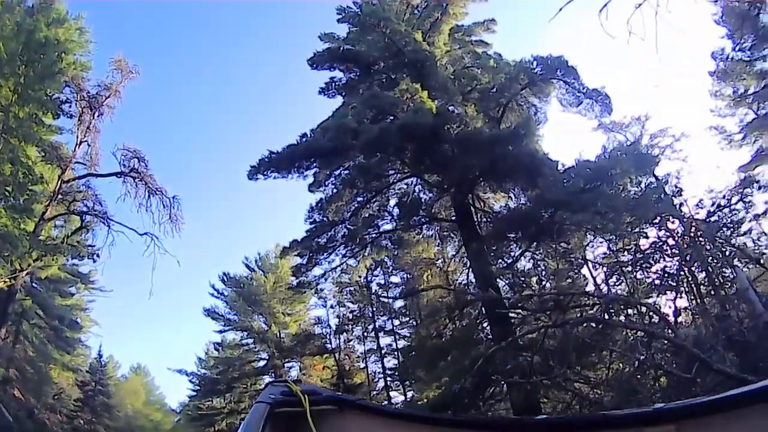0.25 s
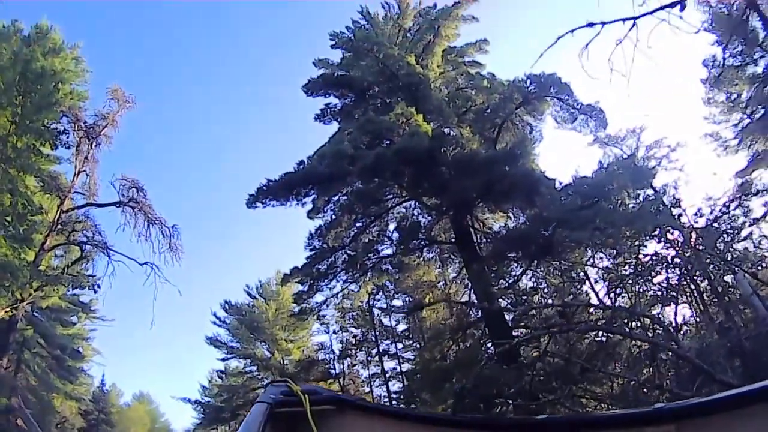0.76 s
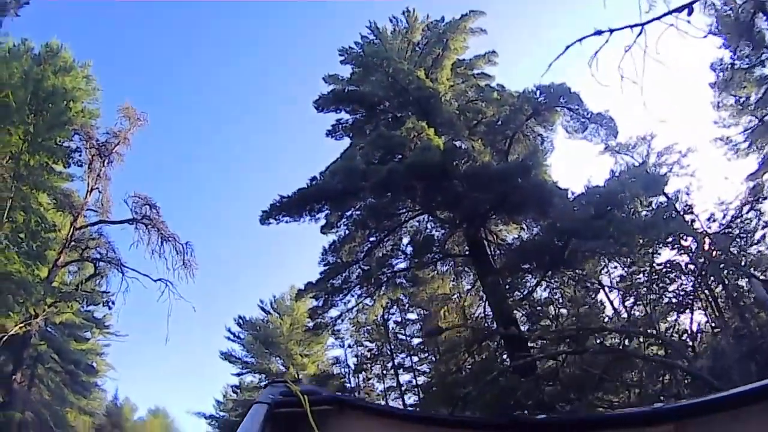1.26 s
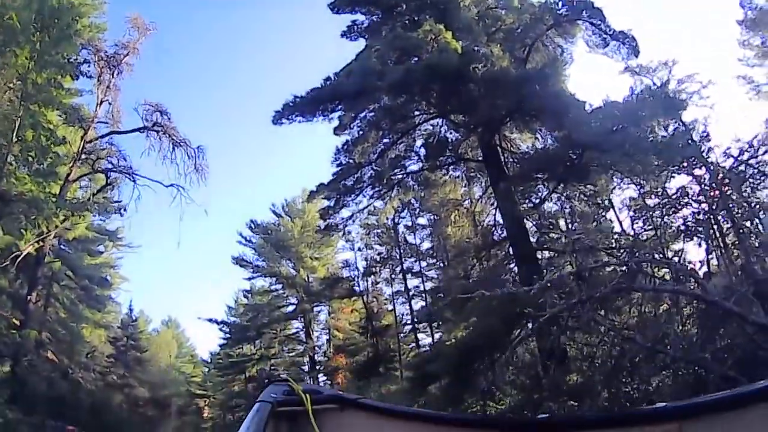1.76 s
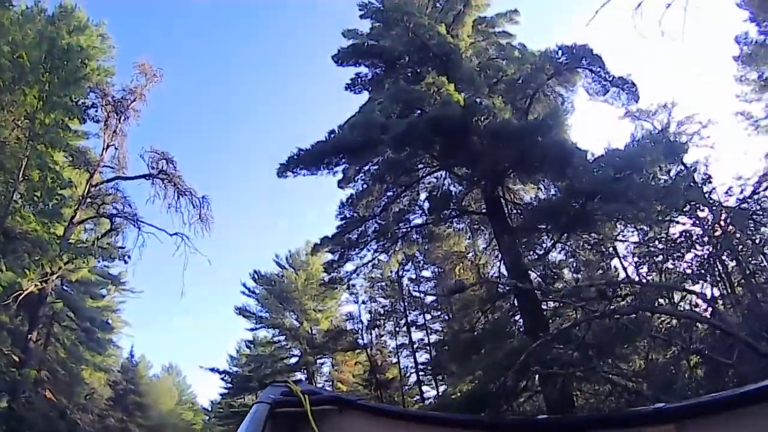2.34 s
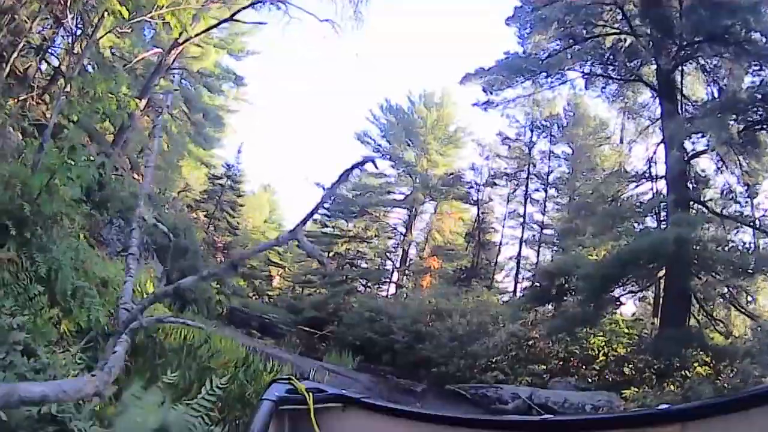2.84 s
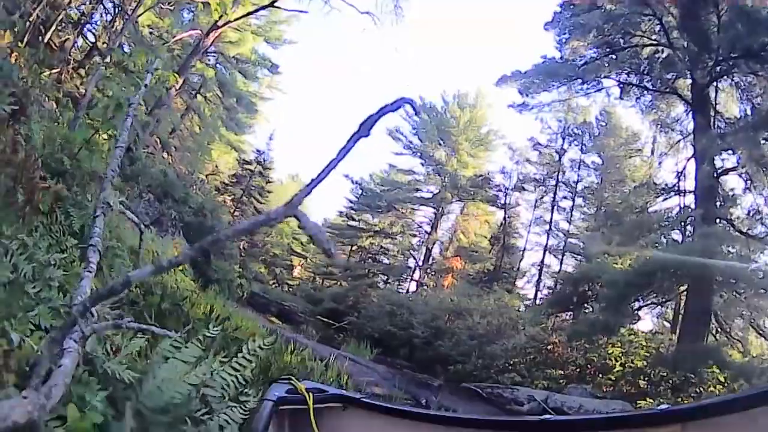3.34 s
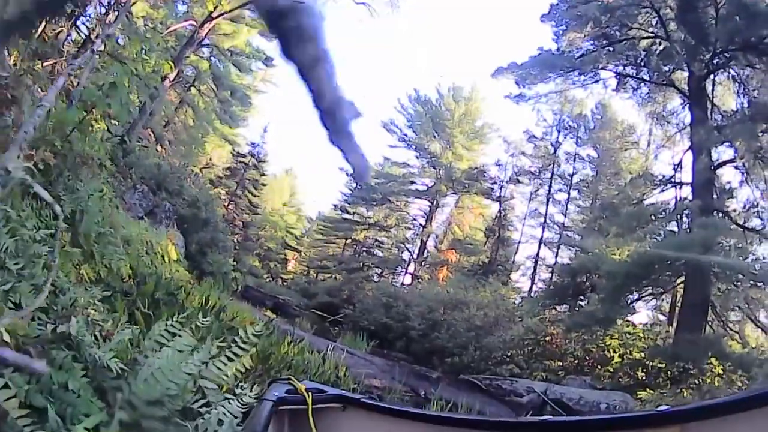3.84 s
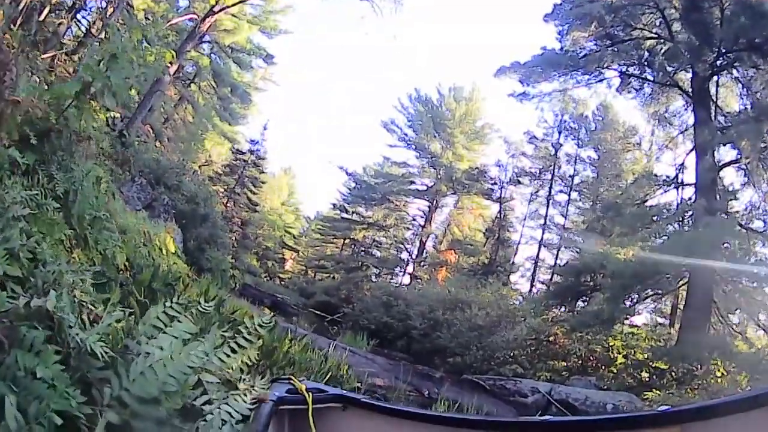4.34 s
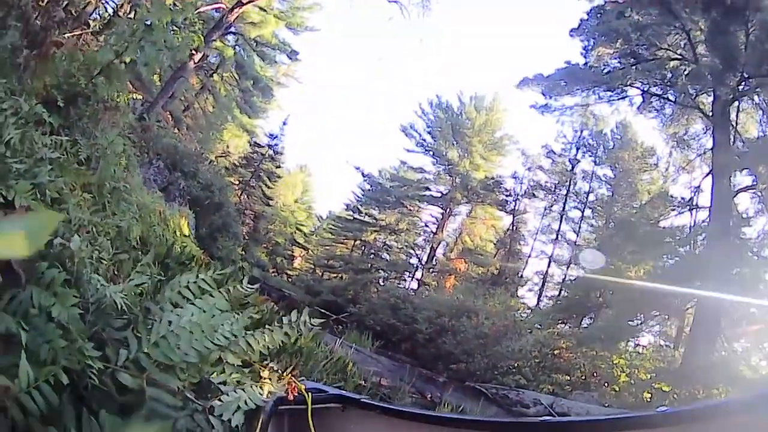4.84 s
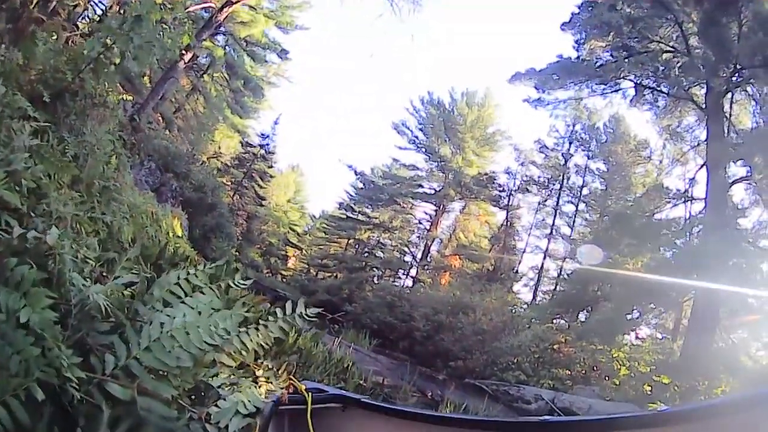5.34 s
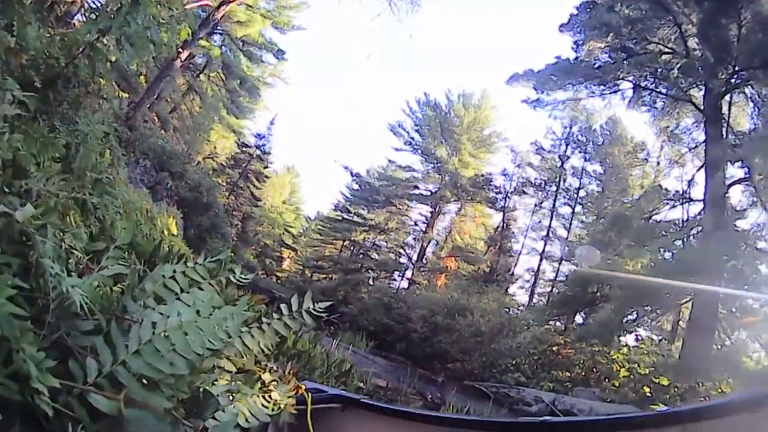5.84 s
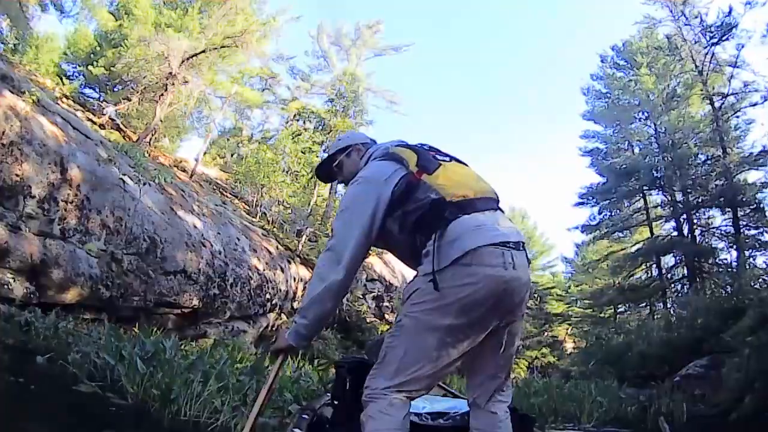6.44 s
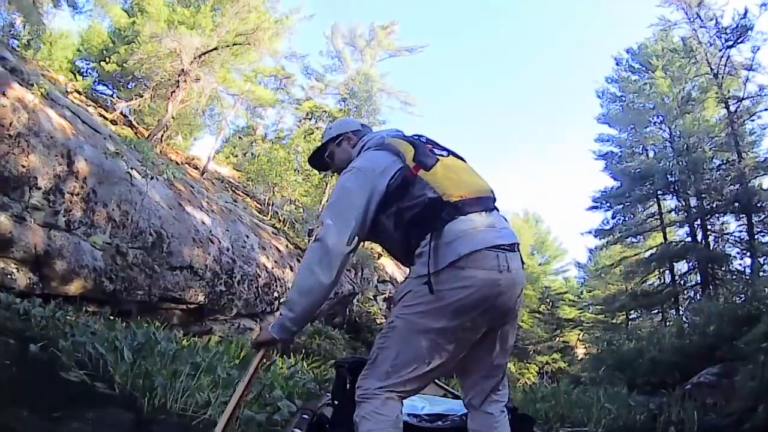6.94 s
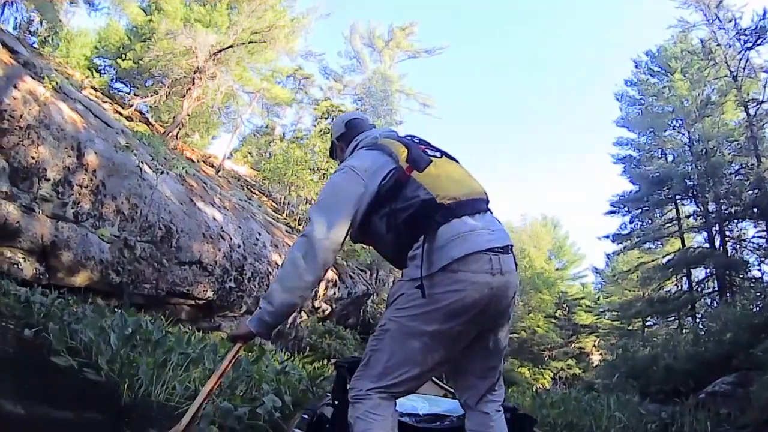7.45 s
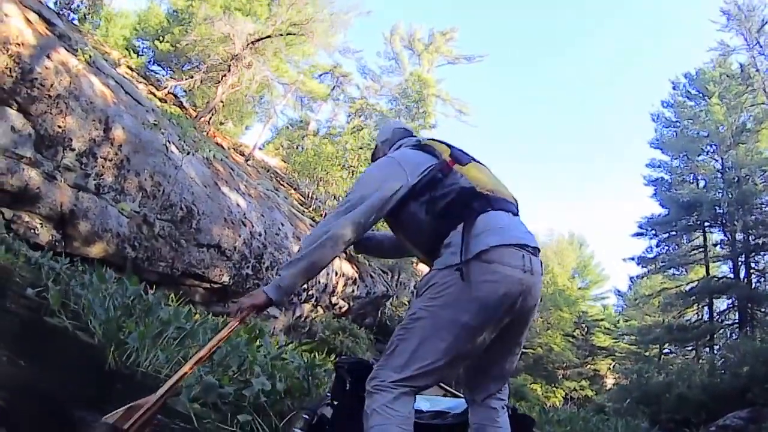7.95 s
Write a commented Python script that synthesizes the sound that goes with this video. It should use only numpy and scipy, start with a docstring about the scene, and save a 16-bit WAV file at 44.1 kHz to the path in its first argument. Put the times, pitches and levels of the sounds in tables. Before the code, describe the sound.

Gear clacks and thumps in a boat while its hull shudders over the shallow bottom. The scraping strengthens around two very hard, distorted bumps, with low wavering groans between. Dry twigs tick and a branch squeaks in high gliding chirps. The scraping stops near the end, leaving gentle water along the hull, faint hiss and a thin whine. The microphone rides on the boat, resonant and dull in the treble.

```python
"""Canoe shoved along a shallow creek

Gear knocks in the boat: clicks ring the hull's flex, its panels and a plastic case; twigs tick as dry noise bursts.
The hull grinds over the bottom (random slips ring those modes, near-regular ones groan), then slides on
through shaped-noise water. A branch squeaks along the side: a gliding stick-slip tone that breaks into chirps.
The microphone rides on the boat in the closed case, which rings near 1.4 kHz and muffles the treble;
hard blows clip the input, over hiss and a faint late whine."""
import sys
import numpy as np
from scipy import signal
from scipy.fft import rfft, irfft
from scipy.io import wavfile
from scipy.ndimage import uniform_filter1d

SR = 44100
rng = np.random.default_rng(int(sys.argv[2]) if len(sys.argv) > 2 else 0)


def digitize_waveform(pressure):
    """Quantize a signal to 16-bit integers and store it at the path in sys.argv[1].

    Rows of a 2-D input are taken as channels; values are limited to [-1, 1].
    """
    field = np.atleast_2d(pressure).T
    bounded = np.clip(field, -1, 1)
    quanta = np.round(bounded * 32767).astype(np.int16)
    wavfile.write(sys.argv[1], SR, quanta)


N = 361179
TIME = np.arange(N) / SR

# Levels in the tables are drive levels, ahead of each layer's own trims.
# resonances of the whole hull flexing: (f/Hz, relative level/dB, t60/s before scaling)
FLEX_MODES = [(44.8, -16.5, 0.39), (73.4, 0.5, 0.15), (81.76, 2.5, 0.44), (98.3, -9.5, 0.31),
              (104.6, -1.5, 0.1), (144.8, -8, 0.47), (173, 1.5, 0.092)]
# resonances of the hull panels: (f/Hz, relative level/dB, t60/s before scaling)
PANEL_MODES = [(187.45, -11, 0.42), (199.2, -10.5, 0.31), (258.8, -27, 0.83), (301.1, -2, 0.19),
               (330.2, 1.5, 0.17), (355.9, -1, 0.12), (395.9, -4, 0.11), (454.9, 2, 0.088),
               (509.2, -2, 0.09), (591.7, -2.5, 0.048), (660.2, -3.5, 0.1), (833.6, -8, 0.07)]
# resonances of the plastic case: (f/Hz, relative level/dB, t60/s before scaling)
CASE_MODES = [(1022, -20, 0.11), (1185.3, -6, 0.052), (1327, 4, 0.013), (1454, -1, 0.047),
              (1565, -3.5, 0.032), (1714, -0.5, 0.041), (1948, -4, 0.02), (2066, -8.5, 0.032),
              (3160, -9.5, 0.0045), (3740, -28, 0.043), (4220, -45, 0.0045)]

# the hull slides over the bottom, levels as at its end:
# (start t/s, end t/s, flex level/dB, panel level/dB, rasp level/dB, growth from start to end/dB)
SLIDES = [(-.05, 0.607, -49.5, -35.5, -42, -5), (0.704, 0.994, -48, -38, -77, -8),
          (1.207, 1.7, -52, -39, -53.5, 0.5), (1.88, 2.252, -52, -40.5, -55, -5),
          (2.32, 2.498, -69, -46.5, -51.5, -10), (2.509, 2.988, -35, -24, -33, 12),
          (2.993, 3.155, -36, -19, -22, -14), (3.21, 3.89, -46, -33.5, -34.5, 0.5),
          (3.858, 4.488, -45.5, -23.5, -34.5, 1.5), (4.695, 4.928, -24.5, -19.5, -30.5, 8),
          (4.91, 5.453, -57, -15.5, -29, 4.5), (5.445, 5.973, -44, -23, -36.5, 2),
          (5.978, 6.302, -28, -25.5, -38.5, -1)]
# the hull shifting between slides: (flex level/dB, panel level/dB, rasp level/dB)
RESTING_DB = (-50.5, -45.5, -72.5)
# brief hard scuffs: (middle t/s, half-length/s, panel level/dB, rasp level/dB)
SCUFFS = [(2.801, 0.014, -45, -23), (2.832, 0.02, -20, -75), (3.843, 0.013, -40.5, -21),
          (4.275, 0.024, -32, -34)]
GRIP_S, COAST_S = 0.079, 0.048   # a slide takes hold; time constant of its dying away
GRIT_PER_S, GRIT_DB = 20, 1.5   # grains cracking under the hull; drive against the rasp
FLOAT_S = 6.42   # the hull comes free of the bottom

# colour of the water wash: (f/Hz, relative density level/dB per Hz)
WASH_COLOUR = [(35, -52), (60, -15), (92, 0), (112, -34.5), (129, -14), (188, 1.5), (206, 1), (226, -31.5),
               (280, -54), (321, 1), (374, -3), (638, -9.5), (880, -33.5), (1430, -8.5), (2300, -20.5),
               (2990, -36), (5060, -120)]
SHALLOWS_DB = -50   # drive of the lapping while the hull is aground
WASH_DB, WASH_GAIN_DB_PER_S = -43, 5   # drive as the hull floats free, growing as the boat gathers way

# blows on the boat: (t/s, hull flex level/dB, panel ring level/dB, sharp clack level/dB)
KNOCKS = [(0.18, -25, -8, 0), (.218, -48, -12.5, -33), (.696, -62, -20.5, -18.5), (0.787, -35, -18.5, -32),
          (0.867, -57, -22, -10.5), (.921, -60, -40, -27.5), (1.14, -54, -24, -26),
          (1.359, -69, -45, -30.5), (1.536, -29, 0.5, -0.5), (1.816, -42, -20, -12), (1.889, -38, -13, 3.5),
          (1.9, -33, -9.5, -7), (2.033, -41, -21, -50), (2.134, -39, -7.5, 3.5), (2.205, -30, -20.5, -14),
          (2.516, -21, -30, -50), (2.551, -47, -25, -21.5), (2.774, -27.5, -11, -10),
          (2.978, -45, -18, -9.5), (3.014, -26, 21, 18), (3.152, -6.5, -1.5, 6.5), (3.237, -30, -18, -35),
          (3.34, -21.5, -23.5, -19), (3.501, -52, -21, -10), (3.812, -36, -17, -22), (3.846, -46, -17, -8),
          (4.155, -42, -29, -11), (4.574, -55, -38, -14.5), (4.621, -58, -28, -19.5),
          (4.641, -1, 15.5, 7.5), (4.72, -12, -15, -5.5), (4.924, -15, -8.5, -31), (5.153, -50, -9, -5.5),
          (5.181, -27, -8.5, -3), (5.279, -49, -5, -16), (5.328, -45, -5.5, 8), (5.338, -33, -18, 7),
          (5.373, -29, -24, 5), (5.409, -30, -20, -5), (5.819, -21.5, -15, -17), (6.018, -10.5, -19, -46),
          (6.057, -37, -18.5, -10.5), (6.197, -21, -18, -33), (6.243, -14.5, -21, -23),
          (6.789, -25, -32, -60)]
# juddering after the two hardest bumps:
# (first rebound t/s, flex level/dB, panel level/dB, clack level/dB)
JUDDERS = [(3.040, 1, 1.5, 11), (4.66, -4.5, -2.5, 2.5)]
REBOUND_S = .0218   # spacing of the rebounds
# lost per rebound: (flex level/dB, panel level/dB, clack level/dB)
REBOUND_LOSS_DB = (1, 2.5, 4.5)

# twigs tick on the case: (t/s, peak level/dB)
TICKS = [(0.2746, -40), (0.3205, -40), (2.0964, -47), (2.675, -37), (3.8125, -44), (6.057, -24.5),
         (6.107, -35), (6.2326, -35), (6.244, -41)]
# a faint high jingle follows some bumps: (t/s, level/dB)
JINGLES = [(.24, -67), (4.73, -59.5), (6.03, -63), (6.17, -86)]
JINGLE_DECAY_S = 0.31   # time constant

# a short rubbing squeak: (t/s, f/Hz, level/dB)
SQUEAK = [(1.2, 3253, -64), (1.222, 3557, -47.5), (1.238, 3000, -58), (1.254, 1986, -33.5),
          (1.268, 2020, -26.5), (1.284, 2620, -53), (1.296, 2500, -54), (1.312, 3270, -44),
          (1.335, 3352, -63)]
# the branch squeals along the side: (t/s, f/Hz, level/dB)
SQUEAL = [(3.42, 2569, -45), (3.434, 2340, -30), (3.458, 2720, -38.5), (3.526, 2762, -33),
          (3.55, 2274, -22.5), (3.576, 2240, -34), (3.726, 2356, -31.5), (3.746, 2510, -41),
          (3.792, 2426, -34.5), (3.815, 2480, -37)]
PRESS_S, PRESS_HALF_S = 3.635, 0.067   # where the branch presses hardest, and for how long either side
OCTAVE_DROP_DB = -21.5   # the half-pitch tone at full pressure
LOCK_HZ, LOCK_GRIP = 1184, 1.8   # resonance that the half-pitch tone locks to, and how readily

# the branch skitters in runs of short chirps: (start t/s, end t/s, f/Hz, level/dB)
SKITTERS = [(2.872, 2.91, 2690, -45), (3.168, 3.275, 2990, -36), (3.272, 3.346, 2274, -30.5),
            (3.283, 3.427, 3060, -45), (3.866, 3.953, 2510, -38.5), (5.171, 5.303, 2950, -40.5)]
CHIRP_S = .034   # usual length
# shares of the pitch: scatter between chirps, fall within a chirp, random variation of that glide
CHIRP_SPREAD, CHIRP_SAG, CHIRP_BEND = 0.023, 0.093, 0.066

# groans of the sticking and slipping hull: (start t/s, length/s, starting f/Hz, peak level/dB)
GROANS = [(3.029, 0.28, 176, -14.5), (3.87, 0.51, 180.6, -28), (3.95, 0.13, 319, -24.5),
          (4.25, 0.29, 305, -27), (4.68, 0.12, 161.6, -10.5), (5.02, 0.53, 313.6, -15.5)]
GROAN_RISE_PER_S, GROAN_PEAK_AT = .14, 0.34   # share of pitch gained per second; share of length at the peak
GROAN_FLUTTER_DB = 2.3

CASE_CUT_HZ, CASE_LEAK_DB = 2236, -6.5   # the closed case muffles the treble above the cut
OVERLOAD = .32   # amplitude at which the input clips
HISS_DB, HISS_LATE_DB, HISS_STEP_S = -65, -59, 6.33   # electronic hiss steps up near the end
WHINE_HZ, WHINE_DB = 10850, -79
CUTOFF_HZ = 16100


def from_db(db):
    """Decibels to gain."""
    return 10 ** (np.asarray(db) / 20)


def rms_one(x):
    """Scale to unit power."""
    return x / np.sqrt(np.mean(x ** 2) + 1e-20)


def in_time(rows):
    """Draw each column of a curve at every sample."""
    s, *columns = np.transpose(rows)
    return [np.interp(TIME, s, c) for c in columns]


def butter(x, hz, kind, order=2):
    """Causal low- or high-pass."""
    return signal.sosfilt(signal.butter(order, np.clip(hz, 10, .45 * SR), kind, fs=SR, output="sos"), x)


def drift(hz):
    """Random wander up to about hz, spread 1."""
    return rms_one(butter(rng.standard_normal(N + SR), hz, "low")[SR:])


def swell(middle, half_length):
    """A smooth bump of height 1."""
    return np.exp(-np.minimum(((TIME - middle) / half_length) ** 2, 50))


def ring(force, hz, t60):
    """A resonance: a unit click sets a sine of height 1 ringing and dying away."""
    r = from_db(-60 / (t60 * SR))
    w = 2 * np.pi * hz / SR
    return signal.lfilter([0, np.sin(w)], [1, -2 * r * np.cos(w), r * r], force + 1e-18)


def rub(modes, slips_per_s, size_db, tilt_db, damping):
    """Small random slips keep the modes ringing; damping divides their ring times, tilt_db is per octave."""
    slip_sizes = from_db(size_db * np.minimum(rng.exponential(1, N), 4))
    slips = (rng.random(N) < slips_per_s / SR) * slip_sizes
    out = np.zeros(N)
    for hz, db, t60 in modes:
        force = slips * rng.standard_normal(N)
        out += from_db(db + tilt_db * np.log2(hz)) * ring(force, hz, t60 / damping)
    return rms_one(out)


def steady(x, window_s):
    """Even out slow swells, so that the push alone sets the level."""
    power = uniform_filter1d(x ** 2, max(int(window_s * SR), 2))
    return x / np.sqrt(np.abs(power) + 1e-6)


def slide_gains():
    """Each slide takes hold, grows or fades steadily and dies away; gains of flex, panels and rasp."""
    power = from_db(RESTING_DB)[:, None] ** 2
    for start, end, *db, growth_db in SLIDES:
        progress = np.clip((TIME - start) / (end - start), 0, 1)
        grip = np.clip((TIME - start) / GRIP_S, 0, 1)
        coast = np.exp(-np.clip((TIME - end) / COAST_S, 0, 50))
        push = grip * coast * from_db(growth_db * (progress - 1.0))
        power = power + np.outer(from_db(db), push) ** 2
    return np.sqrt(power)


def grit_ticks(rasp_gain):
    """Single grains crack under the hull, scaled with the rasp, and tick in shortened case modes."""
    crack_sizes = from_db(GRIT_DB + 4.3 * rng.standard_normal(N))
    cracks = (rng.random(N) < GRIT_PER_S / SR) * crack_sizes * rasp_gain
    return sum(from_db(db / 2) * ring(cracks * rng.standard_normal(N), hz, t60 * 0.22)
               for hz, db, t60 in CASE_MODES)


def scrape():
    """The hull sticks and slips on the bottom: a low shudder, a hollow body sound and a gritty rasp."""
    flex_gain, panel_gain, rasp_gain = slide_gains()
    panel_scuffs = sum(from_db(db) * swell(s, width) for s, width, db, _ in SCUFFS)
    rasp_scuffs = sum(from_db(db) * swell(s, width) for s, width, _, db in SCUFFS)
    panel_gain = from_db(-2.5) * panel_gain + panel_scuffs
    rasp_gain = from_db(-0.2) * rasp_gain + rasp_scuffs
    flex = steady(rub(FLEX_MODES, slips_per_s=340, size_db=1.0, tilt_db=-4.5, damping=0.72), window_s=0.42)
    panels = steady(rub(PANEL_MODES, slips_per_s=350, size_db=2.5, tilt_db=-3.5, damping=0.77), window_s=0.1)
    rasp = steady(rub(CASE_MODES, slips_per_s=2500, size_db=3.0, tilt_db=-3.4, damping=1.21), window_s=0.052)
    catching = from_db(0.52 * drift(50))   # the grit catches and lets go many times a second
    gritty_rasp = rasp_gain * catching * butter(rasp, 820, "high")
    return flex_gain * flex + panel_gain * panels + gritty_rasp + grit_ticks(rasp_gain)


def water():
    """A soft wash of shaped noise along the hull, which hums faintly with it; trickles ring in the case."""
    hz, db = np.transpose(WASH_COLOUR)
    bins = np.maximum(np.fft.rfftfreq(N, 1 / SR), 1)
    colour = from_db(np.interp(np.log(bins), np.log(hz), db))
    wash = rms_one(irfft(rfft(rng.standard_normal(N)) * colour, N))
    hum = rub(PANEL_MODES, slips_per_s=3100, size_db=4.5, tilt_db=2.5, damping=0.94)
    trickle = rub(CASE_MODES, slips_per_s=700, size_db=3.0, tilt_db=-1.0, damping=0.82)
    level_db = np.where(TIME < FLOAT_S, SHALLOWS_DB, WASH_DB + WASH_GAIN_DB_PER_S * (TIME - FLOAT_S))
    lapping_db = 0.78 * drift(7.3)
    mix = from_db(-3.5) * wash + from_db(-7) * hum + from_db(-8.5) * trickle
    return from_db(level_db + lapping_db) * mix


def all_blows():
    """All knocks, and four weakening rebounds for each judder."""
    rebounds = []
    for s, *db in JUDDERS:
        for k in range(4):
            weakened_db = np.array(db) - k * np.array(REBOUND_LOSS_DB)
            rebounds.append((s + k * REBOUND_S, *weakened_db))
    return np.array(KNOCKS + rebounds)


def strike(modes, level_db, scatter_db, chatter, chatter_s):
    """Each blow is a click and a short dying chatter; every mode takes its own share of it."""
    at = (all_blows()[:, 0] * SR).astype(int)
    age = TIME[:SR // 4]
    fade = np.exp(-age / chatter_s)
    fade /= np.linalg.norm(fade)
    total = np.linalg.norm(from_db(np.array(modes)[:, 1]))
    out = np.zeros(N)
    for k, (hz, mode_db, t60) in enumerate(modes):
        blows = chatter * fade * rng.standard_normal((len(at), len(age)))
        blows[:, 0] += (-1) ** k   # the click, with alternating sign from mode to mode
        share_db = level_db + mode_db + scatter_db * rng.standard_normal(len(at))
        blows *= from_db(share_db)[:, None]
        force = np.zeros(N + len(age))
        for start, blow in zip(at, blows):
            force[start:start + len(age)] += blow
        out += ring(force[:N], hz, t60)
    return out / total


def knocks():
    """Blows flex the hull, ring its panels and rattle the case."""
    _, flex_db, panel_db, clack_db = all_blows().T
    flex = strike(FLEX_MODES, flex_db, scatter_db=0.6, chatter=0.21, chatter_s=0.026)
    panels = strike(PANEL_MODES, panel_db - 4.5, scatter_db=0.5, chatter=0.82, chatter_s=0.014)
    clack = strike(CASE_MODES, clack_db - 4.5, scatter_db=2.63, chatter=0.77, chatter_s=0.0065)
    return flex + panels + clack


def bursts(rows, decay_s):
    """An envelope that jumps at each event and dies away."""
    return sum(from_db(db) * (TIME >= s) * np.exp(-np.clip((TIME - s) / decay_s, 0, 50)) for s, db in rows)


def small_sounds():
    """Dry ticks of band-limited noise on the case, and jingles of sparse tiny pings high in the treble."""
    tick_noise = butter(butter(rng.standard_normal(N), 1930, "low"), 890, "high")
    ticks = bursts(TICKS, decay_s=0.0028) * rms_one(tick_noise)
    pings = sum(ring(rng.standard_normal(N) * (rng.random(N) < 90 / SR), hz, 0.0023)
                for hz in np.linspace(7200, 9600, num=9))
    jingles = bursts(JINGLES, decay_s=JINGLE_DECAY_S) * rms_one(pings)
    return from_db(1) * ticks + jingles


def squeal(phase, overtone_db):
    """The uneven motion of a stick-slip cycle has weak overtones."""
    return np.sin(phase) + from_db(overtone_db) * (np.sin(2 * phase) + from_db(-10) * np.sin(3 * phase))


def squeak(rows, gain_db, waver, grit_db, overtone_db):
    """Fast stick-slip with an unsteady pitch; under most pressure a tone an octave lower locks to a resonance."""
    hz, level_db = in_time(rows)
    pressed = np.exp(-np.minimum(np.abs((TIME - PRESS_S) / PRESS_HALF_S) ** 4, 50))
    locked = np.clip(LOCK_GRIP * pressed, 0, 1)
    free_hz = hz * (1 + waver * drift(665))
    locked_hz = 2 * LOCK_HZ * (1 + 0.016 * drift(240))
    phase = 2 * np.pi * np.cumsum((1 - locked) * free_hz + locked * locked_hz) / SR
    half_pitch = np.sin(phase / 2) + from_db(-26.5) * np.sin(phase + phase / 2)
    doubled = from_db(OCTAVE_DROP_DB + 3.2 * drift(29.2)) * pressed * half_pitch
    grit = from_db(grit_db) * butter(rng.standard_normal(N), 8200, "low", order=1)
    touching = (TIME > rows[0][0]) & (TIME < rows[-1][0])
    flutter = from_db(2.6 * drift(150))
    tone = flutter * from_db(level_db + gain_db) * (squeal(phase, overtone_db) + grit)
    return np.sqrt(2) * touching * (tone + doubled)


def skitter():
    """Under light pressure the squeak breaks up into rough little glides of uneven length, pitch and direction."""
    out = np.zeros(N)
    unsteady = 1 + 0.051 * drift(700)
    chances = rng.standard_normal((len(SKITTERS), 16, 3))
    for (start, end, hz, db), chance in zip(SKITTERS, chances):
        count = int(np.clip(round((end - start) / CHIRP_S), 1, len(chance)))
        shares = np.cumsum(np.r_[0, np.exp(.25 * chance[:count, 0])])   # uneven lengths
        edges = ((start + (end - start) * shares / shares[-1]) * SR).astype(int)
        for first, last, (_, detune, bend) in zip(edges, edges[1:], chance):
            progress = np.linspace(0, 1, last - first)
            glide = (CHIRP_BEND * bend - CHIRP_SAG) * (progress - .5)
            pitch = hz * (1 + CHIRP_SPREAD * detune + glide) * unsteady[first:last]
            phase = 2 * np.pi * np.cumsum(pitch) / SR
            envelope = np.sqrt(np.abs(np.sin(np.pi * progress)))
            out[first:last] += from_db(db) * envelope * squeal(phase, overtone_db=-25)
    return out * from_db(2.6 * drift(160) - 3.5)


def groan(start, length, hz, peak_db):
    """Nearly regular slips give a low wavering tone that swells, fades and creeps up in pitch."""
    age = TIME - start
    pitch = hz * (1 + GROAN_RISE_PER_S * age + 0.02226 * drift(34.0))
    phase = 2 * np.pi * np.cumsum(pitch) / SR
    envelope = np.interp(age / length, [0, GROAN_PEAK_AT, 1], [0, 1, 0])
    gain = envelope * from_db(peak_db + GROAN_FLUTTER_DB * drift(23))
    return np.sqrt(2) * gain * (np.sin(phase) + from_db(-21.5) * np.sin(2 * phase))


def through_case(x):
    """The deepest lows are removed; the closed case passes the rest of the lows and weakens the treble."""
    x = butter(x, 38, "high")
    leak = from_db(CASE_LEAK_DB) * butter(x, CASE_CUT_HZ, "high")
    return butter(x, CASE_CUT_HZ, "low", order=14) + leak


def scene():
    """Boat and water heard through the case, with the branch and twigs close by."""
    aground = np.clip((FLOAT_S - TIME) / 0.023, 0, 1)
    boat = aground * scrape() + knocks() + sum(groan(*row) for row in GROANS)
    short_squeak = squeak(SQUEAK, gain_db=2, waver=0.0082, grit_db=-28, overtone_db=-45)
    long_squeal = squeak(SQUEAL, gain_db=0, waver=0.0235, grit_db=-23, overtone_db=-25)
    branch = short_squeak + long_squeal + skitter()
    return (through_case(boat + water()) + branch + small_sounds())[None]


def overload(x, count=4):
    """The input stage flattens peaks, also between the samples."""
    fine = signal.resample_poly(x, count, 1, axis=-1)
    return signal.resample_poly(np.clip(fine, -OVERLOAD, OVERLOAD), 1, count, axis=-1)


def record(dry):
    """The input clips hard, hisses and, near the end, whines faintly; the top is cut."""
    hiss_db = np.where(TIME < HISS_STEP_S, HISS_DB, HISS_LATE_DB)
    white = rng.standard_normal(N)
    hiss = from_db(hiss_db) * rms_one(white + 0.071 * butter(white, 2700, "low", order=1))
    whine_tone = rms_one(ring(rng.standard_normal(N), WHINE_HZ, .015))
    whine = from_db(WHINE_DB) * (TIME > HISS_STEP_S) * whine_tone
    top_cut = signal.firwin(255, CUTOFF_HZ, fs=SR)
    return signal.fftconvolve(overload(dry) + hiss + whine, top_cut[None], mode="same")


dry = scene()
out = record(dry)
digitize_waveform(out)
```